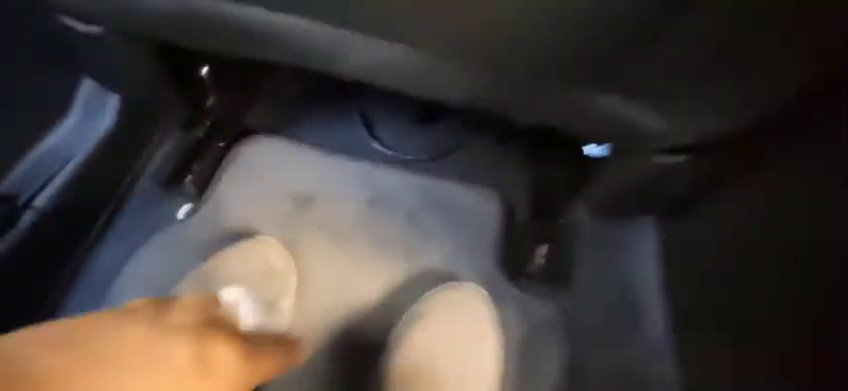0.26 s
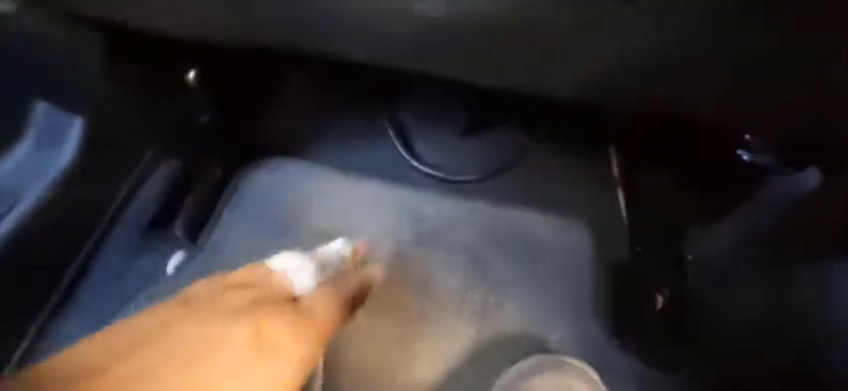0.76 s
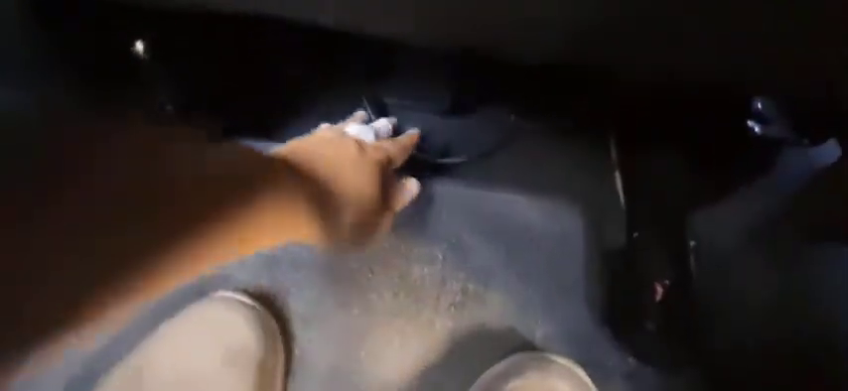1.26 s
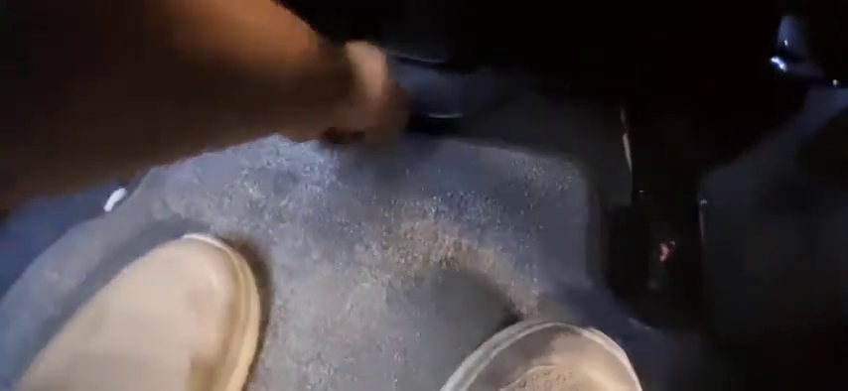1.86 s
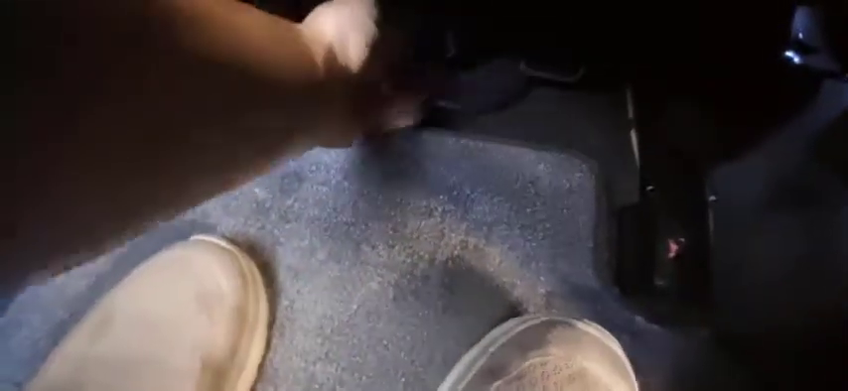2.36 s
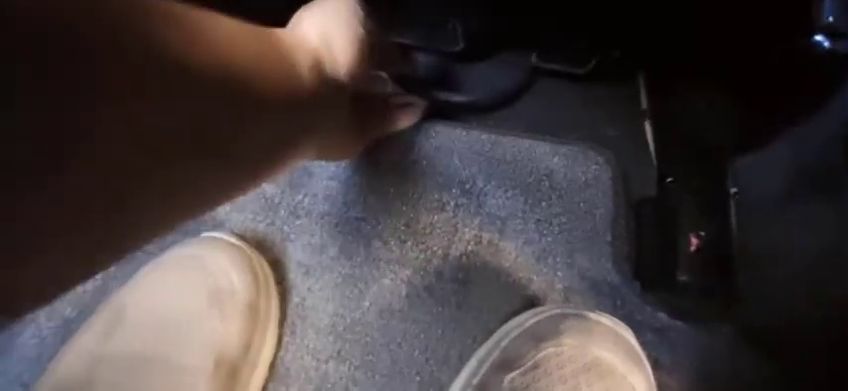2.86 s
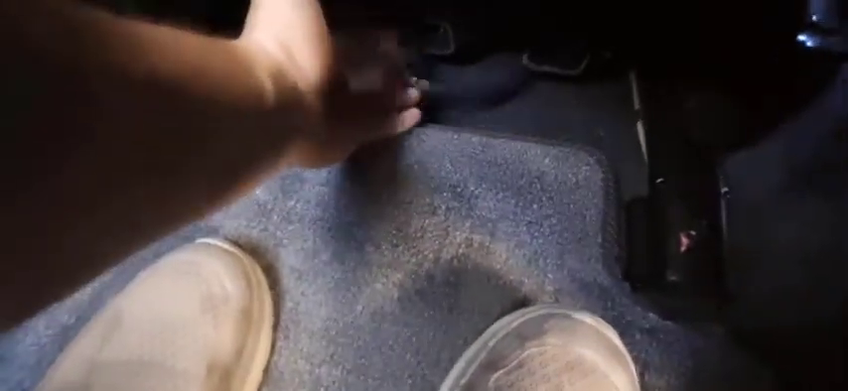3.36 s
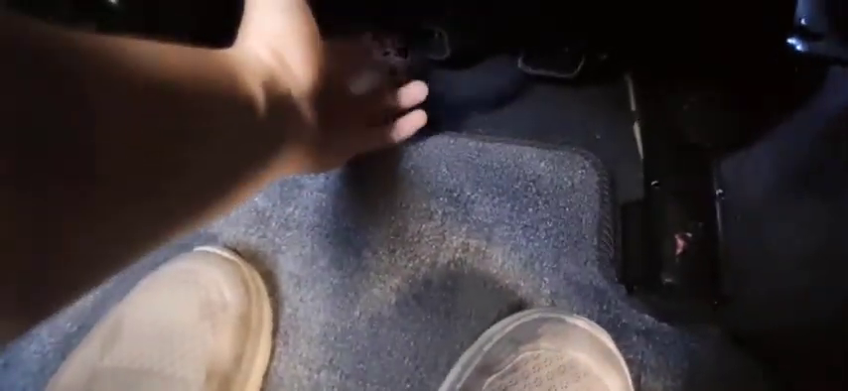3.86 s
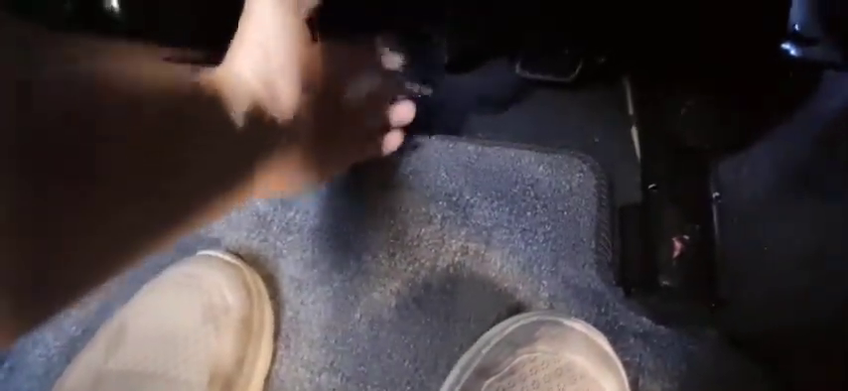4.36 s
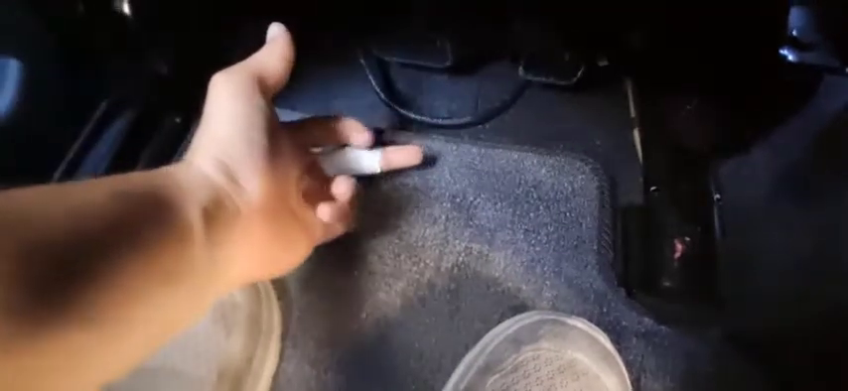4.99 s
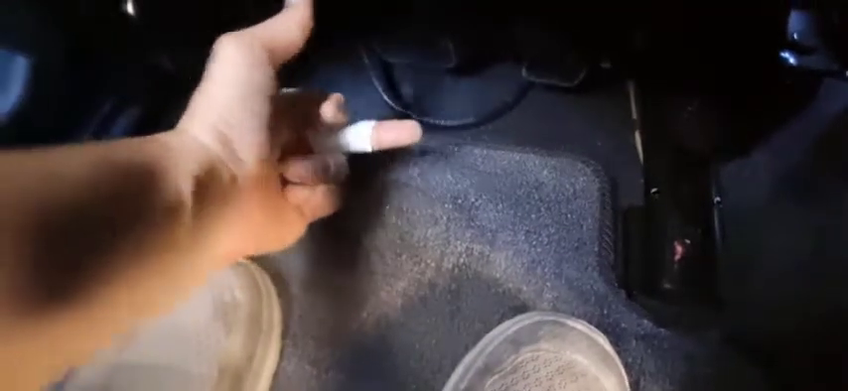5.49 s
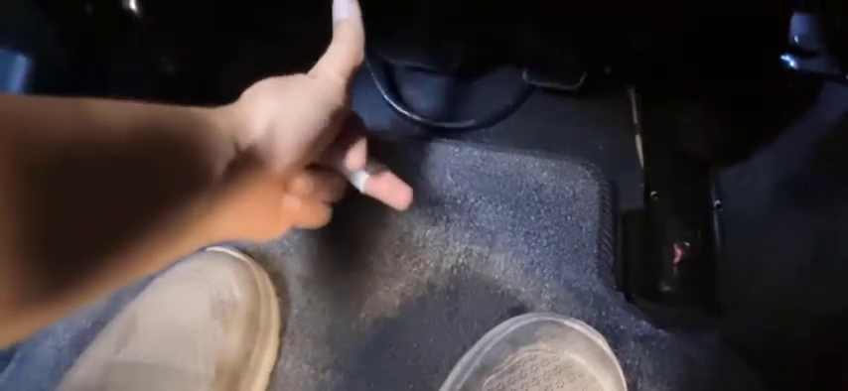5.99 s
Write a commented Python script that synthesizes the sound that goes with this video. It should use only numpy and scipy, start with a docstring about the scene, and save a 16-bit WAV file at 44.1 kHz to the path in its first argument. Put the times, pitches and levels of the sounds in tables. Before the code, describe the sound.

Inside a quiet parked car, rustling, bumps and plastic clicks lead to a knock and a run of muffled finger taps.

```python
"""A parked car rumbles faintly. A sleeve sweeps past the microphone and clothes rustle as a hand reaches
into the footwell, bumping and scraping along a panel under the dashboard while plastic trim snaps.
At two seconds the hand knocks on the panel and a small steel part pings; then it slides over the trim.
From three seconds the fingertips tap six times, each a dull thud of the flexing panel in the small,
padded cabin. Last, hand and arm brush softly as they draw back."""
import sys
import numpy as np
from scipy import signal
from scipy.fft import rfft, irfft, next_fast_len
from scipy.io import wavfile
from scipy.ndimage import map_coordinates

SR = 44100
rng = np.random.default_rng(int(sys.argv[2]) if len(sys.argv) > 2 else 0)


def materialize(psi):
    """Save the field psi as 16-bit PCM at rate SR to the path in sys.argv[1].

    A 1-D psi becomes a single channel; in a 2-D psi each row is a channel.
    """
    bounded = np.clip(np.atleast_2d(psi).T, -1, 1)
    quanta = np.round(bounded * 32767).astype(np.int16)
    wavfile.write(sys.argv[1], SR, quanta)


N = 274728
T = np.arange(SR // 3) / SR  # seconds within one event


def amp(db):
    """Decibels to gain."""
    return 10 ** (np.asarray(db) / 20)


def unit(pair):
    """Scale a stereo pair so that its middle has rms 1."""
    return pair / np.sqrt(np.mean(pair.mean(0) ** 2) + 1e-20)


def match_energy(pair, envelope):
    """Give a burst the energy of unit noise under the envelope."""
    return unit(pair) * np.sqrt(np.mean(envelope ** 2))


def along(points, hz):
    """Read (Hz, value) points on a log axis."""
    freqs, values = np.transpose(points)
    return np.interp(np.log(hz + 1), np.log(freqs), values)


def wobble(rate, size=N):
    """A smooth random curve, rate knots a second."""
    knots = rng.standard_normal(int(size * rate / SR) + 4)
    return map_coordinates(knots, [np.arange(size) * rate / SR])


def add(track, start, sound):
    """Mix a sound into the track at start seconds."""
    part = track[:, max(round(start * SR), 0):][:, :sound.shape[-1]]
    part += sound[..., :part.shape[1]]


def filtered(x, response):
    """Filter x by a complex response of frequency."""
    n = x.shape[-1]
    padded = next_fast_len(n + SR // 4)
    return irfft(rfft(x, padded) * response(np.fft.rfftfreq(padded, 1 / SR)), padded)[..., :n]


def colour(x, points, size=4096):
    """Minimum-phase EQ through (Hz, dB) points."""
    cepstrum = irfft(np.log(amp(along(points, np.fft.rfftfreq(size, 1 / SR)))))
    cepstrum[1:size // 2] *= 2
    cepstrum[size // 2 + 1:] = 0
    impulse = irfft(np.exp(rfft(cepstrum)))
    return signal.fftconvolve(x, impulse[None], axes=1)[:, :x.shape[1]]


def resonances(modes, hz, damping=1):
    """Causal response of (Hz, width, dB) modes; damping widens them all."""
    return sum((-1) ** k * amp(db) * 1j * hz * width / (centre ** 2 - hz ** 2 + 1j * hz * width * damping)
               for k, (centre, width, db) in enumerate(modes))


# Stereo image. Each row: frequency in Hz, left-right likeness (1 is mono).
LIKENESS = [(40, 0.92), (70, 0.96), (130, 0.96), (300, 0.96), (700, 0.5), (1600, 0), (16000, 0)]
def spread(pair):
    """Two unrelated signals become left and right: alike in the bass, unrelated in the treble."""
    angle = lambda hz: np.arccos(np.clip(along(LIKENESS, hz), -1, 1)) / 2
    mid, side = filtered(pair, lambda hz: np.array([np.ones_like(hz), np.tan(angle(hz))]))
    return np.array([mid + side, mid - side])


def rush(points, grain_db=0, grain_rate=100):
    """Coloured stereo noise of rms 1; its level flickers in grains, as when fibres catch and let go."""
    noise = rng.standard_normal((2, N)) * amp(grain_db * wobble(grain_rate))
    return unit(filtered(spread(noise), lambda hz: amp(along(points, hz))))


def strokes(rows, shape=2.08, share=1, edge_db=6):
    """Swells, one gain curve per dB column; shape 2 is a bell, higher is flatter; share scales length."""
    middle, length, *levels = np.transpose(rows)[..., None]
    fade_db = -edge_db * np.abs((np.arange(N) / SR - middle) / (share * length / 2)) ** shape
    return [np.linalg.norm(amp(db + fade_db), axis=0) for db in levels]


def tick(points, t60, tail_db, tail_t60):
    """A short crack and its weak answer from the footwell walls."""
    envelope = amp(-60 * T / t60) + amp(tail_db - 60 * T / tail_t60)
    return match_energy(colour(envelope * rng.standard_normal((2, len(T))), points), envelope)


def walls(pair, wall_db=-11, reach_s=0.01, count=7):
    """The close sides of the footwell return weak copies that comb the treble."""
    echoes = np.zeros((2, len(T)))
    echoes[:, 0] = 1
    for delays in rng.uniform(0.0011, reach_s, (count, 2)):
        echoes[[0, 1], np.round(delays * SR).astype(int)] += amp(wall_db) * rng.choice([-1, 1], 2)
    return signal.fftconvolve(pair, echoes / np.linalg.norm(echoes[0]), axes=1)[:, :N]


# The two layers of room tone. Each row: frequency in Hz, relative level in dB.
RUMBLE_EQ = [(12, -65), (20, -17), (38, -10.5), (61, -4.5), (97, -6.5), (142, -16), (240, -28),
             (268, -30.5), (300, -32), (399, -41.5), (541, -42), (900, -54.5), (1170, -77.5), (1980, -120)]
HISS_EQ = [(410, -43), (700, -9.5), (1280, -7.5), (1380, -7.5), (1520, -6.5), (1800, -7.5), (2130, -5.5),
           (9350, -11), (14400, 0.5), (16000, -17)]
def cabin(rumble_db=-48, hiss_db=-68):
    """A bed of low, uneven rumble in the closed car, with faint hiss."""
    return amp(rumble_db) * rush(RUMBLE_EQ, grain_db=1.5, grain_rate=14) + amp(hiss_db) * rush(HISS_EQ)


# Airy brushes as hand and arm draw back. Each row: middle in seconds, length in seconds, level in dB.
BRUSHES = [(4.24, .1, -58), (4.38, .24, -59.5), (4.85, 0.53, -60.5), (5.35, 0.26, -65.5),
           (5.62, 0.62, -65.5), (5.85, 0.1, -64.5)]
# The brush that goes with every tap: delay in seconds, length in seconds, level in dB.
TAP_BRUSH = (0.0148, 0.2, -59.5)
# Their thin tone. Each row: frequency in Hz, relative level in dB.
BRUSH_EQ = [(1500, -16), (3000, -15.5), (5800, -13.5), (7000, -6.5), (8000, -7), (9200, -19),
            (13000, -13.5), (16000, -18.5)]
def brushes():
    """Hand and arm graze the trim."""
    delay, length, db = TAP_BRUSH
    rows = BRUSHES + [(tap[0] + delay, length, db) for tap in TAPS]
    return strokes(rows)[0] * rush(BRUSH_EQ, grain_db=2.5, grain_rate=210)


# Light slides of the hand. Each row: middle in seconds, length in seconds, level in dB.
SLIDES = [(2.71, 0.31, -48), (3.0, 0.34, -47.5)]
# Their dry tone. Each row: frequency in Hz, relative level in dB.
SLIDE_EQ = [(400, -10.5), (700, -11.5), (1000, -19.5), (1400, -10), (2400, -6.5), (3200, -2.5), (3550, 0),
            (4100, -4.5), (5000, -2), (5900, -8), (7600, -4), (10300, -20.5), (14500, -13.5),
            (16000, -24.5)]
def slides():
    """Skin rubs over trim and mat with a coarse grain."""
    return strokes(SLIDES)[0] * rush(SLIDE_EQ, grain_db=3.0, grain_rate=130)


# The body leaning in. Each row: middle and length in seconds, then swish, crumple and handling in dB.
SHIFTS = [(.64, 0.28, -55.5, -58, -37), (.93, 0.36, -42.5, -50, -28.5), (1.38, 0.43, -43.5, -47, -36),
          (1.73, 0.57, -41.5, -47, -35), (2.08, 0.25, -49.5, -43.5, -30.5), (2.46, 0.32, -56, -56.5, -37.5)]
# Bright swish and dull crumple. Each row: frequency in Hz, relative level in dB.
SWISH_EQ = [(710, -27.5), (1200, -8), (1720, -7), (2000, -1), (2380, -5), (2590, -3.5), (3740, -7),
            (5300, -6), (6100, -7), (7660, -6), (9410, -16.5), (14500, -13.5), (16000, -21)]
CRUMPLE_EQ = [(150, -30.5), (280, -3), (550, 1.5), (900, -8.5), (1500, -11.5), (3000, -35)]
FOLD_SHARE = 0.79  # crumple and handling swell over this middle share of a shift
def clothes():
    """Two layers for each shift of the body: cloth rubs and its folds crumple."""
    swish = strokes(SHIFTS)[0] * rush(SWISH_EQ, grain_db=2.0, grain_rate=530)
    crumple = strokes(SHIFTS, share=FOLD_SHARE)[1] * rush(CRUMPLE_EQ, grain_db=2.0, grain_rate=200)
    return swish, crumple


# Sleeve passes. Each row: middle and length in seconds, then cloth and handling in dB.
SWEEPS = [(0.03, .2, -40.5, -30), (.33, .41, -30.5, -27)]
# Their broad tone. Each row: frequency in Hz, relative level in dB.
SWEEP_EQ = [(150, -32), (250, -1.5), (468, -5), (788, -15.5), (1060, -11.5), (1180, -11), (1450, -7.5),
            (2360, -12.5), (5250, -12), (7980, -13.5), (10200, -26), (12100, -18.5), (14700, -18.5),
            (16000, -24)]
SWEEP_SHAPE = 5.3  # flat top, steep ends
def sleeve():
    """A sleeve sweeps past the microphone in a fine-grained rush."""
    return strokes(SWEEPS, SWEEP_SHAPE)[0] * rush(SWEEP_EQ, grain_db=0.55, grain_rate=580)


# Bassy handling noise. Each row: frequency in Hz, relative level in dB.
HANDLING_EQ = [(20, -21.5), (45, -10.5), (70, -0.5), (115, -3), (170, -11), (280, -18.5), (500, -38),
               (1000, -76.5)]
def handling():
    """Sweeps and shifts jostle the microphone into a low mutter."""
    jostle = np.hypot(strokes(SWEEPS, SWEEP_SHAPE)[1], strokes(SHIFTS, share=FOLD_SHARE)[2])
    return jostle * rush(HANDLING_EQ, grain_db=2.0, grain_rate=30)


# Thin metal pings. Each row: start in seconds, level in dB, pitch in Hz, 60 dB decay in seconds.
PINGS = [(2.006, -33, 7400, 0.093), (2.095, -34, 7400, 0.094), (3.642, -50.5, 7160, 0.35),
         (3.888, -44.5, 7220, 0.21)]
def pings(upper_ratio=1.0786, upper_db=-6):
    """A small steel part rings as a finger lets go: two partials, the upper one dying sooner."""
    out = np.zeros((2, N))
    for start, db, hz, t60 in PINGS:
        phase = rng.uniform(-1.1, 1, (2, 1))
        fade = amp(-60 * T / t60)
        lower = np.sin(2 * np.pi * hz * T + phase)
        upper = amp(upper_db) * fade * np.sin(2 * np.pi * hz * upper_ratio * T - phase)
        add(out, start, amp(db) * fade * (lower + upper))
    return out


# Sticky little finger ticks. Each row: start in seconds, level in dB.
PEELS = [(1.903, -36.5), (2.487, -39.5), (2.7031, -34), (3.0945, -39), (3.4077, -39.5), (3.6404, -39.5),
         (3.8869, -42.5), (4.199, -41)]
# The crisp tone of skin on plastic. Each row: frequency in Hz, relative level in dB.
SKIN_EQ = [(1000, -18.5), (3500, -10.5), (5800, -7), (7300, 1), (8100, -1), (9200, -7), (13000, -14),
           (16000, -15.5)]
def peels(lift_s=0.053, lift_db=-49.5):
    """Skin ticks as it peels off the plastic; a finger also lifts just before each tap."""
    out = np.zeros((2, N))
    for start, db in PEELS + [(tap[0] - lift_s, lift_db) for tap in TAPS]:
        add(out, start, amp(db) * tick(SKIN_EQ, t60=.018, tail_db=-14, tail_t60=.12))
    return out


# Sharp clicks of the trim. Each row: start in seconds, high partial in dB, low partial in dB.
SNAPS = [(0.5425, -39, -31), (0.7474, -32.5, -30), (0.9093, -33.5, -40), (0.937, -38, -26.5),
         (0.9785, -33, -31.5), (1.152, -37.5, -35), (1.376, -39, -32.5), (1.5332, -10, -19.5),
         (1.5405, -15, -18.5), (1.6512, -23, -30), (1.723, -20.5, -27.5)]
# The tone of each partial. Each row: frequency in Hz, relative level in dB.
SNAP_HIGH_EQ = [(2500, -48), (4000, -11), (5200, -4.5), (7200, -9), (7950, 5.5), (8700, -17.5),
                (12500, -13.5), (16000, -9.5)]
SNAP_LOW_EQ = [(500, -31), (1200, -15), (1650, -12), (1940, -2), (2200, -6), (2800, -7.5), (4000, -22),
               (8000, -25.5)]
def snaps():
    """Plastic snaps with a quick high crack and a slightly longer low one."""
    out = np.zeros((2, N))
    for start, high_db, low_db in SNAPS:
        high = tick(SNAP_HIGH_EQ, t60=.009, tail_db=-16, tail_t60=.05)
        low = tick(SNAP_LOW_EQ, t60=.018, tail_db=-17, tail_t60=.07)
        add(out, start, amp(high_db) * high + amp(low_db) * low)
    return out


# The trim's quickly damped ring. Each row: frequency in Hz, width in Hz, relative level in dB.
TRIM_MODES = [(303.5, 56, 3.5), (470, 40, 1.5), (541, 37, -3), (682.4, 45.5, 0.5), (819, 60, -5.5),
              (964, 52, -6.5), (1157, 117, -7), (1432, 49, -5), (1603, 100, -3), (2093, 97, -2.5),
              (2475, 247, -9), (3064, 590, -12)]
def trim_ring(force, envelope, bright_hz):
    """The trim's modes driven by an uneven force; soft contact leaves out the upper ones."""
    response = lambda hz: resonances(TRIM_MODES, hz) / (1 + 1j * hz / bright_hz) ** 2
    return match_energy(filtered(spread(force * envelope), response), envelope)


# The panel and the air under it. Each row: frequency in Hz, width in Hz, relative level in dB.
PANEL_MODES = [(72, 22, -7), (122.7, 17.8, 5.5), (162.4, 51.7, 2.5), (230, 29.5, 0), (301, 150, -12.5),
               (450, 60, -39)]
def thud(firm_hz, damping, bend_db, highpass_hz=45, skin_hz=700):
    """One soft push on the panel, peak 1; flesh rounds the blow and damps the ring."""
    # the spot that is struck sets the level of the lowest bending mode
    modes = [(hz, width, db + bend_db * (k == 1)) for k, (hz, width, db) in enumerate(PANEL_MODES)]
    # the microphone rolls off the thud's deepest bass
    mic_highpass = lambda hz: 1j * hz / (highpass_hz + 1j * hz)
    flesh = lambda hz: 1 / ((1 + 1j * hz / firm_hz) ** 2 * (1 + 1j * hz / skin_hz))
    response = lambda hz: resonances(modes, hz, damping) * mic_highpass(hz) * flesh(hz)
    ring = filtered(signal.unit_impulse(len(T)), response)
    return ring / np.max(np.abs(ring))


# The hand juddering along the trim.
# Each row: start in seconds, length in seconds, rattle in dB, brightness in Hz, groan in dB.
SCRAPES = [(0.003, 0.0048, -36.5, 800, -46), (0.033, 0.008, -32, 1000, -34),
           (0.734, 0.0057, -36, 890, -42.5), (0.802, 0.0086, -42, 700, -39),
           (0.855, 0.015, -41.5, 920, -35.5), (0.911, 0.084, -37, 1160, -45.5),
           (1.988, 0.016, -25.5, 2000, -29), (2.07, 0.022, -20, 1490, -25),
           (2.325, 0.1, -36.5, 1320, -26.5), (3.273, 0.024, -53, 500, -49),
           (3.406, 0.024, -53.5, 700, -44.5), (3.962, 0.002, -53, 450, -41)]
# Skin dragging over grained plastic. Each row: frequency in Hz, relative level in dB.
GRIT_EQ = [(200, -56.5), (1200, -16.5), (2800, 1), (5000, -2), (6500, -6.5), (7700, -3.5), (9500, -15.5),
           (14000, -12.5), (16000, -17.5)]
def scrapes(slip_db=2.5, slip_rate=800, groan_hz=90, grit_db=-11.5, t60=0.094, rise_share=0.13):
    """Quick uneven slips rattle the trim, make the panel groan and hiss with grit, then die away."""
    out = np.zeros((2, N))
    panel = lambda hz: resonances(PANEL_MODES, hz) / (1 + 1j * hz / groan_hz) ** 2
    for start, length, db, bright_hz, groan_db in SCRAPES:
        envelope = amp(-60 * np.maximum(T - length, 0) / t60)
        envelope *= 1 - np.exp(-T / (rise_share * length))  # longer drags build up more slowly
        slips = amp(slip_db * wobble(slip_rate, len(T))) * rng.standard_normal((2, len(T)))
        groan = filtered(spread(slips * envelope), panel)
        grit = colour(slips * envelope, GRIT_EQ)
        add(out, start, amp(db) * trim_ring(slips, envelope, bright_hz))
        add(out, start, amp(groan_db) * match_energy(groan, envelope))
        add(out, start, amp(db + grit_db) * match_energy(grit, envelope))
    return out


# Muffled bumps of arm and shoes. Each row: start in seconds, level in dB, firmness in Hz.
BUMPS = [(0.003, -23.5, 103), (0.24, -21, 150), (0.334, -17.5, 200), (0.486, -22, 150), (0.542, -24, 130),
         (0.684, -20, 110), (0.741, -23, 298), (0.805, -24, 200), (0.934, -13.5, 108.5), (1.040, -27, 110),
         (1.640, -23, 350), (1.681, -23.5, 351), (1.826, -22, 400), (1.896, -23, 400), (2.05, -20.5, 200),
         (2.302, -31, 294)]
def bumps():
    """A whole limb damps the panel more than a fingertip and favours its lowest bending mode."""
    out = np.zeros((2, N))
    for start, db, firm_hz in BUMPS:
        add(out, start, amp(db) * thud(firm_hz, damping=3.0, bend_db=5.0))
    return out


# The dark tail under a tap. Each row: frequency in Hz, relative level in dB.
BOOM_EQ = [(25, -37.5), (60, -4), (130, -5), (190, -3.5), (280, -11), (450, -24.5), (800, -41.5)]
def boom(t60=0.43, rise_s=0.0087):
    """The cabin's low, diffuse answer to a thud."""
    envelope = amp(-60 * T / t60) * (1 - np.exp(-T / rise_s))
    burst = spread(envelope * rng.standard_normal((2, len(T))))
    return match_energy(colour(burst, BOOM_EQ), envelope)


# Fingertips and knuckles: one knock, then six taps. Each row: start in seconds, thud level in dB,
# firmness in Hz, damping factor, boost of the lowest bending mode in dB, knock brightness in Hz.
TAPS = [(2.09, -5.5, 340, 0.72, 6.5, 2380), (3.04, -19.5, 170, 0.5, 1, 2570),
        (3.325, -14.5, 300, 0.64, -0.5, 3050), (3.574, -12, 200, 0.67, -0.5, 2000),
        (3.831, -13.5, 163, 0.75, 4, 1040), (4.053, -16, 141, 0.7, 3.5, 1780),
        (4.311, -3.5, 312, 1.26, -2, 760)]
def taps(knock_t60=0.11, cabin_db=-26, cabin_t60=0.44, boom_db=-26):
    """The skin scuffs, the trim knocks, the panel flexes and the cabin answers."""
    out = np.zeros((2, N))
    envelope = amp(-60 * T / knock_t60) + amp(cabin_db - 60 * T / cabin_t60)
    for start, db, firm_hz, damping, bend_db, bright_hz in TAPS:
        knock_db = db - 22 + np.log2(firm_hz / 200)  # a firmer blow knocks more
        scuff_db = knock_db - 11 + 6.5 * np.log2(bright_hz / 2000)  # a brighter contact scuffs more
        add(out, start, amp(scuff_db) * tick(SKIN_EQ, t60=.03, tail_db=-6, tail_t60=.25))
        add(out, start, amp(knock_db) * trim_ring(rng.standard_normal((2, len(T))), envelope, bright_hz))
        add(out, start, amp(db) * (thud(firm_hz, damping, bend_db) + amp(boom_db) * boom() / damping))
    return out


# Balance across the spectrum. Each row: frequency in Hz, left minus right in dB.
BALANCE = [(120, 2.5), (400, -1.6), (1000, 1.5), (2000, -7), (4500, -7.5), (7700, -13), (11000, -3),
           (15000, -8)]
def ports(hz):
    """Constant-power gains of the two microphone ports; the right faces the hand and gets more treble."""
    gains = amp(np.outer([.5, -.5], along(BALANCE, hz)))
    return gains / np.sqrt(np.mean(gains ** 2, axis=0))


def scene():
    """The close footwell sounds reach both ports, over room tone that leans slightly left."""
    near = taps() + handling() + bumps() + scrapes() + snaps() + peels() + pings() + sleeve()
    swish, crumple = clothes()
    near += crumple + walls(swish + slides() + brushes())
    return filtered(near, ports) + cabin() * amp([[.7], [-.7]])


def record(dry, ceiling=0.85, top_hz=15900):
    """A soft clip rounds the sharpest peaks, then a steep low-pass cuts the very top."""
    rounded = dry / (1 + np.abs(dry / ceiling) ** 8) ** (1 / 8)
    return filtered(rounded, lambda hz: hz < top_hz)


dry = scene()
out = record(dry)
materialize(out)
```